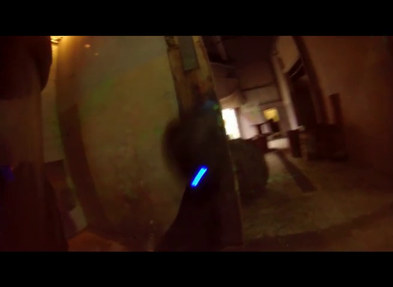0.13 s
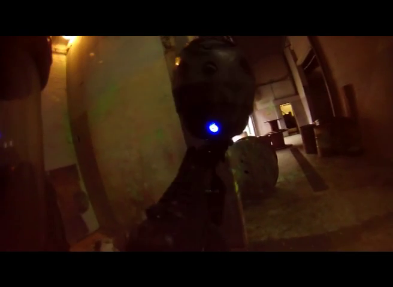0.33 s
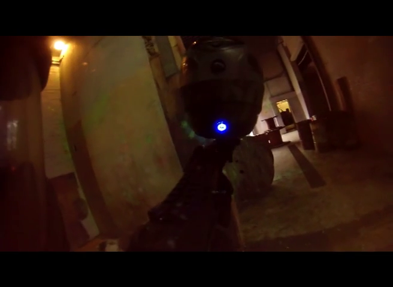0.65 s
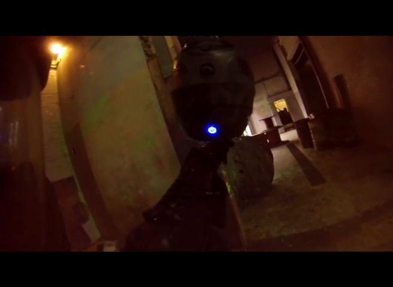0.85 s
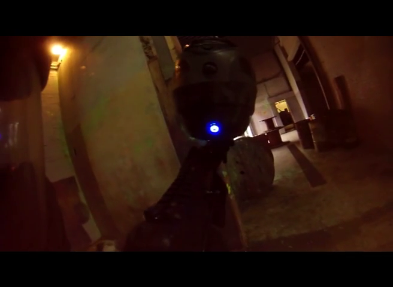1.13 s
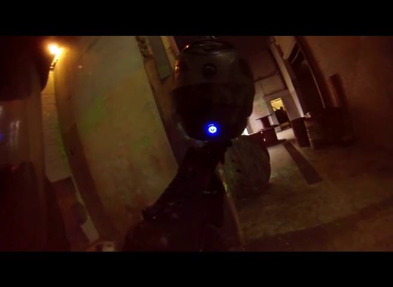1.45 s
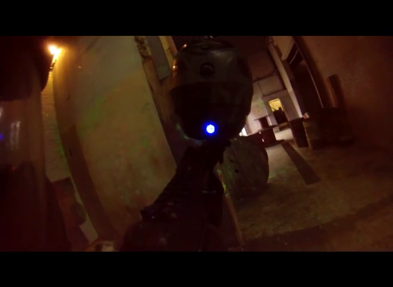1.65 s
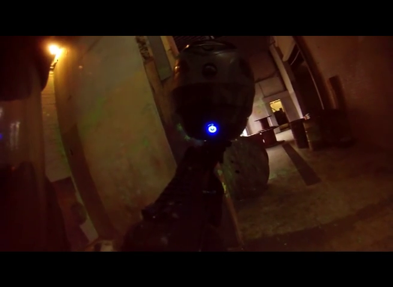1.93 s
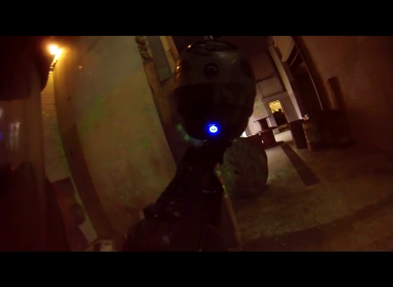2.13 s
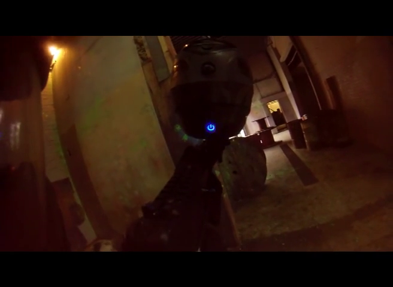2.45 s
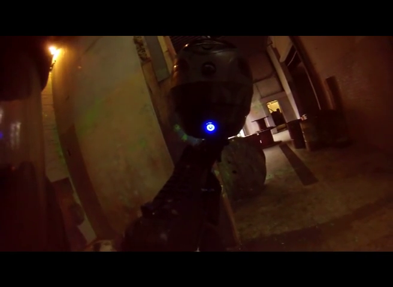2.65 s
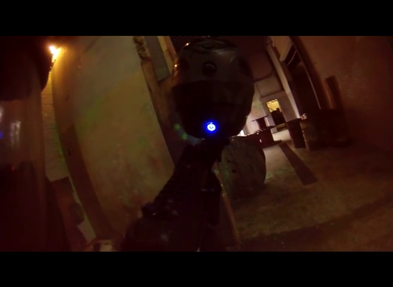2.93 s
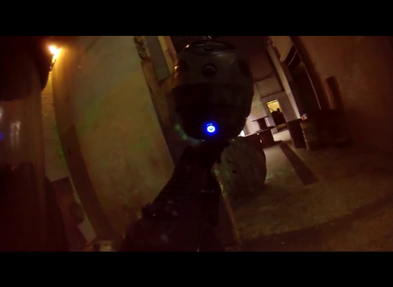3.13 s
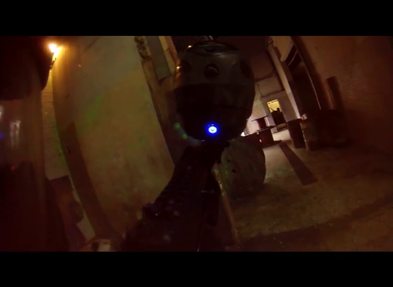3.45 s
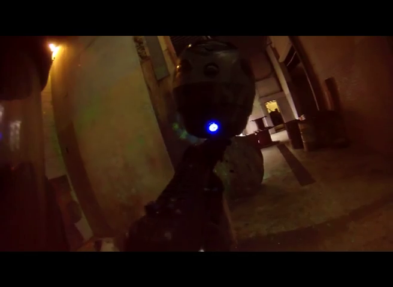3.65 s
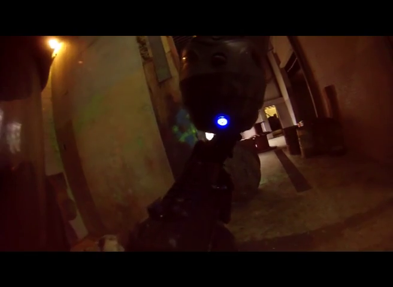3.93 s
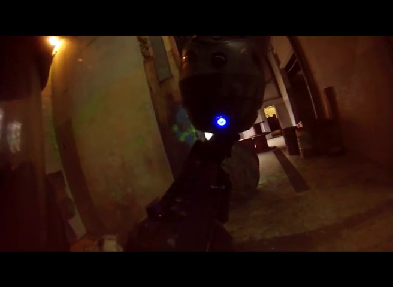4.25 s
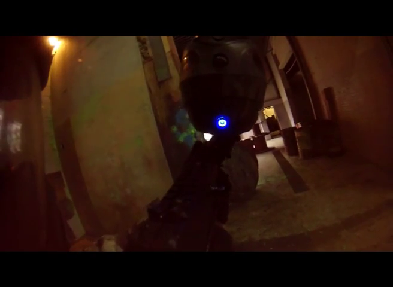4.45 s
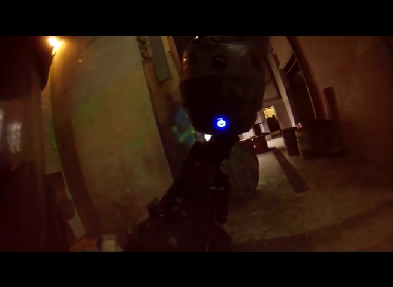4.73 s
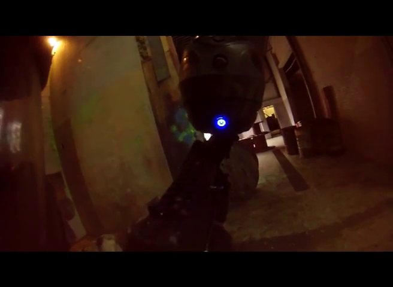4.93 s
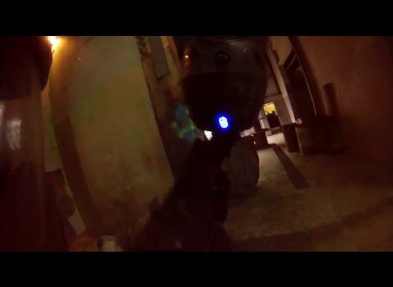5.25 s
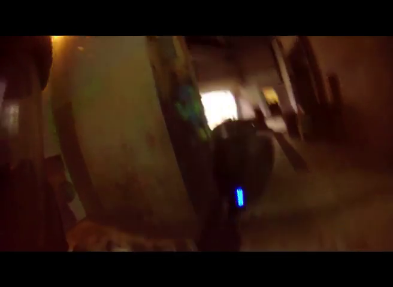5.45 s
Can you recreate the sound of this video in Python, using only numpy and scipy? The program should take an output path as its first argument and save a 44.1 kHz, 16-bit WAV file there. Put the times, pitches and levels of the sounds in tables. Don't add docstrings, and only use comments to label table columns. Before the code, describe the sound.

A large, hard-walled hall with low, lumpy air-handling rumble and very faint microphone hiss. From 0 seconds a distant paintball marker pops dully about six times a second, with small gaps, while soft low bumps come from the camera grip. At about 0.6 seconds a marker within arm's reach begins: twelve shots, at roughly 0.6, 0.85, 1.3, 1.7, 2.0, 2.4, 2.9, 3.4, 3.9, 4.4, 4.8 and 5.3. Each has a tiny valve tick, a very short, harsh gas blast clipping the microphone, a muffled bolt clack some 25 milliseconds later, faint ball rattle, brief gas hiss and low recoil wobble. Thin trigger-release ticks follow. The far firing stops around 4.6, leaving the near shots and their diffuse hall ring; one weak far pop returns near 5.55 as the din fades. The housing muffles the sound, keeping it mid-heavy and boxy.

```python
import sys
import numpy as np
from scipy import signal
from scipy.fft import rfft, irfft
from scipy.io import wavfile

SR = 44100
rng = np.random.default_rng(int(sys.argv[2]) if len(sys.argv) > 2 else 0)


def pcm_store(signal):
    levels = np.round(np.clip(np.atleast_2d(signal), -1, 1) * 32767)
    wavfile.write(sys.argv[1], SR, levels.astype(np.int16).T)


def gain_from_db(level_db):
    decades = np.asarray(level_db, float) / 20
    return 10 ** decades


N = 246959


def rms_one(x):
    return x / np.sqrt(np.mean(x ** 2) + 1e-20)


def at_hz(points, hz):
    table_hz, value = np.transpose(points)
    return np.interp(np.log(hz), np.log(table_hz), value)


def coloured(x, spectrum, size=8192):
    gain = gain_from_db(at_hz(spectrum, np.linspace(1, SR / 2, size // 2 + 1)))
    cepstrum = irfft(np.log(gain))
    cepstrum[1:size // 2] *= 2
    cepstrum[size // 2 + 1:] = 0
    kernel = irfft(np.exp(rfft(cepstrum)))
    return signal.fftconvolve(x, kernel / np.linalg.norm(kernel))[:len(x)]


def clicks(s, size):
    out = np.zeros(N)
    at = np.round(np.asarray(s) * SR).astype(int)
    np.add.at(out, np.clip(at, 0, N - 1), size)
    return out


def dying(x, t60):
    return signal.lfilter([1], [1, -gain_from_db(-60 / (t60 * SR))], x + 1e-18)


def ring(x, hz, t60):
    r, w = gain_from_db(-60 / (t60 * SR)), 2 * np.pi * hz / SR
    return signal.lfilter([0, np.sin(w)], [1, -2 * r * np.cos(w), r * r], x + 1e-18)


def drift(rate_hz):
    r = np.exp(-2 * np.pi * rate_hz / SR)
    wander = signal.lfilter([1], [1, -2 * r, r * r], rng.standard_normal(N + SR))
    return rms_one(wander[SR:])


# [t/s, level/dB, blast/ms, recoil/dB, treble crack/dB]
NEAR_SHOTS = [(0.6164, -0.5, 7.3, 5.5, -5), (0.8473, 1, 7.5, -5, -5.5), (1.2705, 0, 7, 2.5, -1),
              (1.661, -0.5, 7.0, 0, -1), (2.0247, -1.5, 6.6, 7, 1.5), (2.4194, -1.5, 8.1, 3.5, -0.5),
              (2.8604, -0.5, 6.4, -3, 1.5), (3.3921, 0.5, 4.5, 1.5, 2.5), (3.8977, 1.5, 7.4, -9, -3),
              (4.3607, 1, 6.6, -2.5, .5), (4.7969, -1, 7.3, 3, -1), (5.2613, -3, 10, -11, -1)]
# [t/ms, body level/dB, crack level/dB]
BARREL_ECHOES = [
    (0, -6, -30),
    (1.17, 0, -7),
    (2.33, -3, -24),
    (3.5, -1, -18),
    (4.66, -2, -13),
    (5.83, -1, -20),
    (7.0, -7, -30),
]
# [f/Hz, level/dB]
BLAST = [(150, -25.5), (300, -5), (430, -1.5), (600, -12.5), (860, -9), (1090, 1), (1420, -3.5),
         (1850, -6.5), (2150, -12), (2600, -4.5), (3000, 0.5), (3500, -12), (4200, -23), (16000, -89)]
# [f/Hz, level/dB]
CRACK = [(2000, -30), (4800, 0), (8000, -5), (12000, -16), (16000, -20)]


def blasts():
    push, fronts, cracks = np.zeros((3, N))
    noise = rng.standard_normal((2, N))
    ms = np.arange(SR // 10) * 1000 / SR
    chance = rng.standard_normal((len(NEAR_SHOTS), 2, len(BARREL_ECHOES)))
    lag_ms, echo_db, crack_db = np.transpose(BARREL_ECHOES)
    for (s, peak_db, length_ms, _, bright_db), (late, strong) in zip(NEAR_SHOTS, chance):
        fall = np.where(ms < length_ms - .7, 1, gain_from_db(-13 - 1.2 * (ms - length_ms)))
        rush = np.clip(ms / .9, 0, 1) * fall
        rattle = gain_from_db(-24.5 - 0.14 * ms) * np.clip(ms / 4.1, 0, 1)
        at = round((s - .0006) * SR)
        push[at:at + len(ms)] += gain_from_db(peak_db - 6.0) * (rush + rattle)
        moments = s + (lag_ms + .07 * late) / 1000
        fronts += clicks(moments, gain_from_db(peak_db + echo_db + 0.5 * strong))
        cracks += clicks(moments, gain_from_db(peak_db + crack_db + bright_db - 8.5 + 1.5 * strong))
    snap = dying(cracks, .0025) * (np.sign(noise[1]) + .4 * noise[1])
    vent = dying(clicks(np.array(NEAR_SHOTS)[:, 0] + 0.0057, gain_from_db(-38.5)), 0.29) * noise[1]
    body = np.tanh(1.25 * coloured(push * noise[0] + gain_from_db(11) * fronts, BLAST))
    body = signal.sosfilt(signal.butter(4, 4200, fs=SR, output="sos"), gain_from_db(-0.5) * body)
    return body + coloured(snap, CRACK) + treble(vent)


# [f/Hz, level/dB]
TICK = [(500, -20), (1000, -9), (2000, -6), (3100, 0), (4200, -8), (5500, -18), (8300, -21), (11000, -35),
        (16000, -52)]


def treble(x):
    return signal.sosfilt(signal.butter(4, 3900, "high", fs=SR, output="sos"), coloured(x, TICK))


# [t/s, level/dB, mount shove/dB, shell shove/dB]
BOLT_HOME = [(0.6412, -7.5, -4, 4), (0.8676, -1.5, -0.5, 6.5), (1.2999, -4.5, 5, -2),
             (1.6843, -0.5, 1.5, 9.5), (2.0482, -3, -3, 5.5), (2.447, -7.5, 5, -12), (2.8817, -3, 3, 9),
             (3.4158, -6.5, 2, -5), (3.9168, 1, 7, 8), (4.38, -2.5, 3.5, 5.5), (4.821, -6, 1.5, -6),
             (5.2896, -5.5, -8.5, -24)]
# [t/s after home, level/dB]
BALL_RATTLES = [
    (.0105, -16),
    (.022, -26),
]
EDGE_DB = (-43, -29, -38, -43)
RETURN_LEAD_S = .0046
RETURN_DB, BRISK_TRAVEL_MS, RETURN_DB_PER_MS = -12, 23.5, 2.5
RATTLE_SPREAD, KNOCK_SPREAD_DB = .12, 2.5


def bolt_cycle():
    home, home_db, *_ = np.transpose(BOLT_HOME)
    travel_ms = (home - np.array(NEAR_SHOTS)[:, 0]) * 1000
    chance = rng.standard_normal((len(home), 8))
    back_db = RETURN_DB - RETURN_DB_PER_MS * np.maximum(travel_ms - BRISK_TRAVEL_MS, 0)
    s, peak_db = [home - RETURN_LEAD_S, home], [back_db, home_db]
    for k, (lag, level) in enumerate(BALL_RATTLES):
        s.append(home + lag * (1 + RATTLE_SPREAD * chance[:, k]))
        peak_db.append(level + KNOCK_SPREAD_DB * chance[:, 2 + k])
    treble_db = [level + KNOCK_SPREAD_DB * chance[:, 4 + k] for k, level in enumerate(EDGE_DB)]
    return np.ravel(s), np.ravel(peak_db), np.ravel(treble_db)


# [t/s, level/dB]
VALVE_CLOSING = [(0.708, -31), (1.3857, -36.5), (1.786, -36), (2.142, -37), (2.545, -34), (2.9978, -32),
                 (3.5154, -33.5), (4.018, -46), (4.498, -33), (4.9388, -35), (5.372, -28), (5.5974, -38)]
# [f/Hz, level/dB]
KNOCK = [(200, -32.5), (450, 1.5), (1000, -4), (1800, 3.5), (2900, -2), (3600, -7), (5000, -23),
         (16000, -54)]
VALVE_LEAD_S, VALVE_DB = .0155, -26.5


def mechanism():
    noise = rng.standard_normal((4, N))
    opening = clicks(np.array(NEAR_SHOTS)[:, 0] - VALVE_LEAD_S, gain_from_db(VALVE_DB))
    valve = dying(opening, 0.039) * noise[0]
    s, peak_db = np.transpose(VALVE_CLOSING)
    closing = dying(clicks(s, gain_from_db(peak_db + 4.0)), 0.0044) * noise[1]
    closing = np.diff(closing, prepend=0)
    s, peak_db, treble_db = bolt_cycle()
    knocks = dying(clicks(s, gain_from_db(peak_db - 4.0)), 0.013) * noise[2]
    edges = dying(clicks(s, gain_from_db(treble_db)), 0.012) * noise[3]
    return coloured(valve, TICK) + coloured(knocks, KNOCK) + treble(closing + edges)


# [f/Hz, t60/s]
MOUNT_MODES = [
    (43.5, .2),
    (80.5, .13),
    (184, .045),
]
SHOVES = [
    (-.11, -.02, .04),
    (.09, -.11, -.15),
    (-.11, -.02, 0),
    (-.06, -.09, -.16),
    (.13, .17, -.13),
]
# [t/s, level/dB, f/Hz]
GRIP_BUMPS = [
    (0.04, -25.5, 37.7),
    (0.149, -30.5, 32.3),
    (0.234, -28.5, 71),
    (0.309, -34, 66),
    (0.349, -26.5, 69.4),
    (0.93, -27, 58.6),
    (3.691, -26.5, 76),
    (5.209, -31, 61),
    (5.437, -32, 32.3),
    (5.499, -32, 30.3),
]
EXIT_LAG_S = .008
RETURN_MOUNT_DB, RETURN_SHELL_DB = 1.5, 3
LET_GO_DB, LET_GO_HZ = -35, 50


def recoil():
    s, _, _, kick_db, _ = np.transpose(NEAR_SHOTS)
    home, _, home_db, shell_db = np.transpose(BOLT_HOME)
    # (s, mount dB, shell dB)
    steps = [(s - VALVE_LEAD_S, 0, 0),
             (s, kick_db, kick_db),
             (s + EXIT_LAG_S, kick_db, kick_db),
             (home - RETURN_LEAD_S, kick_db + RETURN_MOUNT_DB, RETURN_SHELL_DB),
             (home, home_db, shell_db)]
    out = np.zeros(N)
    for k, (hz, t60) in enumerate(MOUNT_MODES):
        part = 1 + k // 2
        push = sum(clicks(step[0], shove[k] * gain_from_db(step[part])) for step, shove in zip(steps, SHOVES))
        out += ring(push, hz, t60)
    let_go = [(s, LET_GO_DB, LET_GO_HZ) for s, _ in VALVE_CLOSING]
    for s, peak_db, hz in [*GRIP_BUMPS, *let_go]:
        out -= ring(clicks([s], gain_from_db(peak_db + 6.0)), hz, 5.5 / hz)
    return signal.sosfilt(signal.butter(2, [26, 300], "band", fs=SR, output="sos"), out)


# [t/s, level/dB]
FAR_SHOTS = [(0.0, -25.5), (0.124, -25.5), (0.268, -26.5), (0.415, -26.5), (0.579, -26), (0.743, -24.5),
             (1.031, -27.5), (1.174, -25.5), (1.329, -26.5), (1.489, -27), (1.62, -25), (1.769, -23.5),
             (1.929, -24.5), (2.094, -22.5), (2.259, -24), (2.583, -26.5), (2.746, -24.5), (3.032, -23.5),
             (3.19, -23.5), (3.334, -26), (3.519, -29.5), (3.671, -26.5), (3.841, -26), (3.998, -25),
             (4.15, -24.5), (4.298, -24), (4.459, -23.5), (4.599, -29), (5.555, -30)]
# [f/Hz, level/dB]
HALL = [(260, -27.5), (450, -12.5), (560, -10.5), (820, -6.5), (1190, 0), (1500, -1.5), (2200, -7.5),
        (2850, -9), (3600, -21.5), (5300, -30), (6500, -40.5), (7900, -39.5), (9500, -45), (16000, -62)]
FAR_POP_DB, FAR_ECHO_S, FAR_ECHO_DB = -7, 0.031, -16.5


def far_pops():
    s, peak_db = np.transpose(FAR_SHOTS)
    pops = clicks(s, gain_from_db(peak_db + FAR_POP_DB))
    echoes = clicks(s + FAR_ECHO_S, gain_from_db(peak_db + FAR_ECHO_DB))
    return coloured(dying(pops + echoes, 0.025) * rng.standard_normal(N), HALL)


# [f/Hz, t60/s]
HALL_T60 = [(500, 2.55), (1500, 1.41), (3000, 2.2), (6000, 1.67), (12000, 1)]
NEAR_FEED_DB, FAR_FEED_DB = -33.5, -9.5


def hall():
    far_s, far_db = np.transpose(FAR_SHOTS)
    far = clicks(far_s, gain_from_db(2 * (far_db + FAR_FEED_DB)))
    near = clicks(np.array(NEAR_SHOTS)[:, 0] + 0.011, gain_from_db(2 * NEAR_FEED_DB))
    noise, out = rng.standard_normal((2, N)), np.zeros(N)
    surge = drift(26.0)
    early = 0.18 * dying(far, 0.076) + 1.0 * dying(near, 0.14)
    edges_hz = 300 * 2 ** np.arange(0, 6.1, .5)
    for k, (low, high) in enumerate(zip(edges_hz, edges_hz[1:])):
        t60 = at_hz(HALL_T60, np.sqrt(low * high))
        late = dying(far + near, t60 / 2)
        energy = signal.lfilter([.004], [1, -.996], late + early)
        band = signal.sosfilt(signal.butter(2, [low, high], "band", fs=SR, output="sos"), noise[k % 2])
        out += band * np.sqrt(energy) * gain_from_db(1.12 * drift(15.4) + 0.54 * surge)
    return coloured(out, HALL)


# [f/Hz, level/dB]
ROOM_TONE = [(15, -17), (25, 8), (91, -3.5), (103, -0.5), (124, 4.5), (189, -10.5), (204, -4), (286, 2.5),
             (484, -7), (649, -17), (712, -13), (818, -6.5), (1000, -34), (1300, -34), (2200, -120)]
RUMBLE_DB, NEAR_BOOM_DB, FAR_BOOM_DB, BOOM_T60_S = -48, -35.5, -41.5, 1.7
HISS_DB, HISS_HZ = -75, 15000


def room_tone():
    near = clicks(np.array(NEAR_SHOTS)[:, 0], gain_from_db(2 * NEAR_BOOM_DB))
    far = clicks(np.array(FAR_SHOTS)[:, 0], gain_from_db(2 * FAR_BOOM_DB))
    energy = gain_from_db(2 * RUMBLE_DB) + dying(near + far, BOOM_T60_S / 2)
    level = np.sqrt(energy) * gain_from_db(0.5 * drift(27))
    low = level * coloured(rng.standard_normal(N + SR), ROOM_TONE)[SR:]
    hiss = signal.sosfilt(signal.butter(1, HISS_HZ, fs=SR, output="sos"), rng.standard_normal(N))
    return low + gain_from_db(HISS_DB) * hiss


def scene():
    near = blasts() + mechanism() + recoil()
    return (near + far_pops() + hall() + room_tone())[None]


def top_cut(x):
    return signal.sosfilt(signal.butter(12, 16430, fs=SR, output="sos"), x)


def record(dry):
    knee = 14.0
    held = 1.04 * dry / (1 + np.abs(dry) ** knee) ** (1 / knee)
    cut = signal.sosfilt(signal.cheby2(16, 40, 16250, fs=SR, output="sos"), held)
    mix = np.clip(cut, -1, 1)
    return top_cut(mix)


dry = scene()
out = record(dry)
pcm_store(out)
```